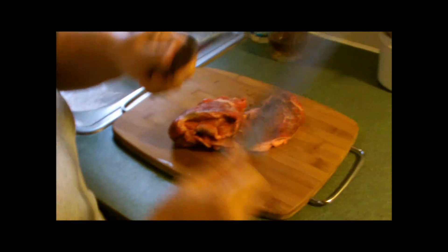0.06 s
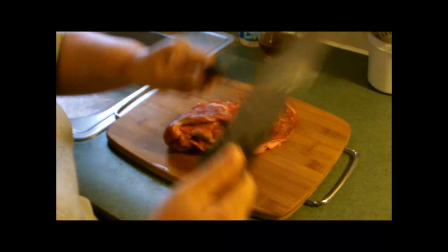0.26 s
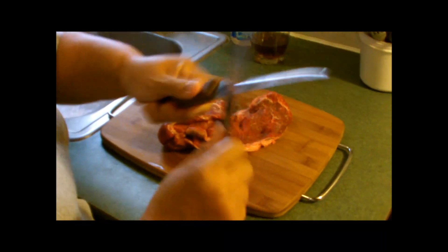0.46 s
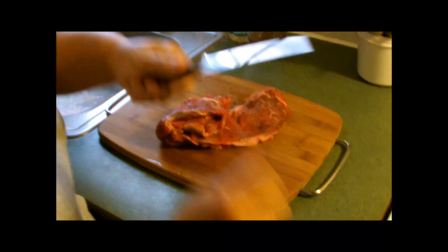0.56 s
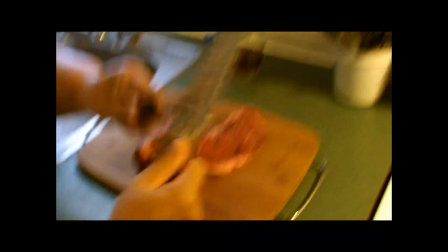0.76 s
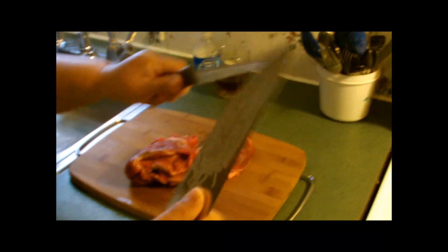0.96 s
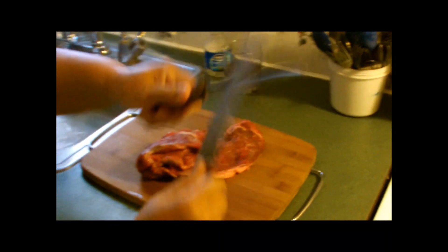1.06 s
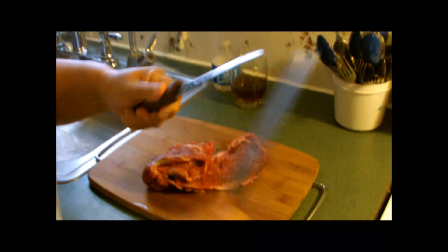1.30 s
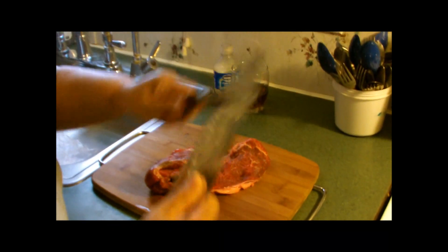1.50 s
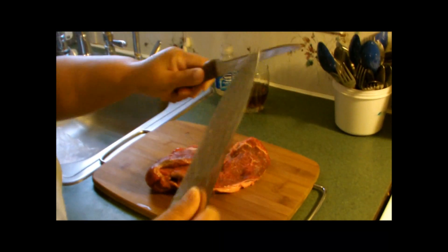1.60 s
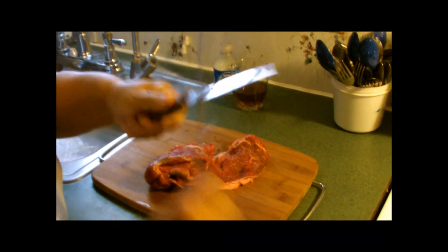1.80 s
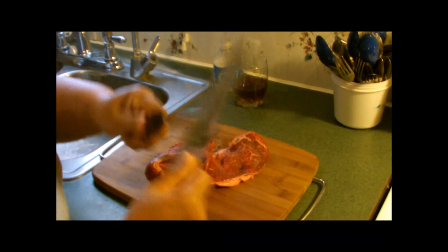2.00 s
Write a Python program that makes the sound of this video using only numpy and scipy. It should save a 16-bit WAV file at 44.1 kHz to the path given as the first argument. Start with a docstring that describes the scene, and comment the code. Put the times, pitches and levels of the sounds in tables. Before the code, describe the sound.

A knife scrapes quickly against another knife in short, bright, clinking sharpening strokes.

```python
"""A kitchen knife is honed on the spine of another, about three strokes a second, on alternate faces.
Each stroke opens with a clink as the blades meet and flex. The edge skims, bites, then scrapes ever
brighter toward the tip, squeaking and catching on nicks, and flicks off. The steel rings on briefly
in a small kitchen, over soft air noise and a faint appliance hum."""
import sys
import numpy as np
from scipy import signal
from scipy.fft import rfft, irfft, next_fast_len
from scipy.io import wavfile
from scipy.ndimage import uniform_filter1d, minimum_filter1d, map_coordinates

SR = 44100
rng = np.random.default_rng(int(sys.argv[2]) if len(sys.argv) > 2 else 0)


def pcm_store(signal):
    """Save signal as 16-bit PCM."""
    levels = np.round(np.clip(np.atleast_2d(signal), -1, 1) * 32767)
    wavfile.write(sys.argv[1], SR, levels.astype(np.int16).T)


N = 90272
LEAD = SR // 4  # samples of honing before time zero
TIME = np.arange(-LEAD, N) / SR
HZ = np.fft.rfftfreq(next_fast_len(2 * len(TIME), True) // 2 * 2, 1 / SR)


def amp(db):
    return 10 ** (np.asarray(db) / 20)


def unit(x):
    return x / np.sqrt(np.mean(x ** 2) + 1e-20)


def along(points, hz):
    """A curve through (freq_hz, value) points on a log axis."""
    freqs, values = np.transpose(points)
    return np.interp(np.log(hz + 1), np.log(freqs + 1), values)


def filtered(x, response):
    """x through a response on the HZ grid."""
    return irfft(rfft(x, 2 * len(HZ) - 2) * response)[..., :len(TIME)]


def colour(points):
    """A causal EQ of unit power, shaped by (freq_hz, gain_db) points."""
    cepstrum = irfft(np.log(unit(amp(along(points, HZ)))))
    cepstrum[1:len(HZ) - 1] *= 2
    cepstrum[len(HZ):] = 0
    return np.exp(rfft(cepstrum))


def wobble(per_s, t=TIME):
    """A smooth random curve with per_s knots a second."""
    return map_coordinates(rng.standard_normal(len(t)), [(t - t[0]) * per_s])


def fade(start_s, t60_s):
    """An envelope with an instant attack and an exponential decay."""
    return (TIME >= start_s) * amp(-60 * np.maximum(TIME - start_s, 0) / t60_s)


# Strokes; the skim and the growth are relative to level_db, the scrape's level at the tip:
# start_s, skim_s, bite_s, level_db, skim_db, growth_db, body_tilt_db, flick_db
STROKES = [(-.152, 0.045, 0.087, -13, -21, -1, 5, -8.5), (0.1846, .022, 0.02, -19, -14.5, .5, 6, -26),
           (0.4718, .044, 0.033, -15.5, -20.5, 2.5, 5.5, -12),
           (0.8261, 0.024, 0.021, -17, -14.5, 4, 10, -27.5), (1.117, 0.0356, 0.049, -15, -24, 2, 1.5, -10),
           (1.451, 0.023, 0.041, -16.5, -15, 4, -0.5, -36),
           (1.7376, 0.0442, 0.039, -13, -21.5, 5.5, 5, -19.5)]
# Darker scrape tone at the heel: freq_hz, gain_db
HEEL_EQ = [(80, -71), (200, -34), (700, -32), (1250, -31), (1650, -20.5), (3000, -5.5), (5500, -5.5),
           (7800, -4.5), (10500, 0.5), (13000, -4.5), (15200, -3)]
# Brighter scrape tone at the tip: freq_hz, gain_db
TIP_EQ = [(80, -62), (200, -50), (700, -34), (1250, -33), (1900, -31), (3000, -12.5), (5000, -5),
          (7500, -1), (10500, 4), (13000, 4), (15200, 0)]
def scrape(stroke_s=.127, release_s=.0065, flick_s=.0029, body_db=-13.5, judder_db=.88):
    """The edge skims, bites and slides from heel to tip, growing brighter, then flicks off."""
    heel, tip, body, places = np.zeros((4, len(TIME)))
    for start_s, skim_s, bite_s, level_db, skim_db, growth_db, body_tilt_db, flick_db in STROKES:
        t = TIME - start_s
        force_db = level_db + np.interp(t, [skim_s, skim_s + bite_s, stroke_s], [skim_db, -growth_db, 0])
        force = (t > 0) * amp(force_db) * np.exp(-np.maximum(t - stroke_s, 0) / release_s)
        place = np.clip((t - skim_s) / (stroke_s - skim_s), 0, 1)  # 0 at the heel, 1 at the tip
        flick = amp(flick_db) * np.exp(-((t - stroke_s) / flick_s) ** 2)
        heel += force * np.sqrt(1 - place)
        tip += force * np.sqrt(place) + flick
        body += force * amp(body_db + body_tilt_db * (1 - 2 * place))
        places = np.where(t > 0, place, places)
    judder = amp(judder_db * wobble(per_s=310))
    heel_rub = filtered(heel * judder * (grit() + squeaks()), colour(HEEL_EQ))
    tip_rub = filtered(tip * judder * (grit() + squeaks()), colour(TIP_EQ))
    return heel_rub + tip_rub + body * judder * blade_body(places)


def grit(hits_per_s=16000, size_spread=.35):
    """Tiny collisions of the two rough edges, of random size, rms 1."""
    hits = rng.random(len(TIME)) < hits_per_s / SR
    polarity = np.sign(rng.standard_normal(len(TIME)))
    size = np.exp(size_spread * rng.standard_normal(len(TIME)))
    return unit(hits * polarity * size)


def squeaks(count=900, low_hz=2711, high_hz=13510, length_s=.013, glide=.027, over_grit_db=-6):
    """Stick-slip: a dense spatter of brief, slightly rising tones of random pitch and size."""
    out, t = np.zeros(len(TIME) + SR), np.arange(int(length_s * SR)) / SR
    swell = np.sin(np.pi * t / length_s) ** 2
    for when, pitch, size in rng.random((count, 3)):
        hz = low_hz + (high_hz - low_hz) * pitch
        phase = 2 * np.pi * hz * t * (1 + glide * t / (2 * length_s))
        out[int(when * len(TIME)):][:len(t)] += size ** 2 * swell * np.sin(phase)
    return amp(over_grit_db) * unit(out[:len(TIME)])


# Blade resonances under the scrape, at mid-stroke: pitch_hz, width_hz, relative_db
BODY_MODES = [(1566, 90, -10), (1789, 90, -13), (2128, 110, -7), (2486, 120, -12), (3053, 140, -2.5),
              (3370, 220, -7), (4654, 200, 8.5), (5350, 160, 3.5), (5910, 190, 8), (6800, 120, 5.5)]
def blade_body(place, pitch_rise=.06):
    """The blade sings in narrow noise bands that rise as the contact slides to the tip, rms 1."""
    warped_s = np.cumsum(1 + pitch_rise * (place - .5)) / SR
    out = np.zeros(len(TIME))
    for hz, width_hz, db in BODY_MODES:
        shake = wobble(2 * width_hz) + 1j * wobble(2 * width_hz)
        out += amp(db) * np.real(shake * np.exp(2j * np.pi * hz * warped_s))
    return unit(out)


# The blades meet: start_s, clink_db, bending_db, bending_pitch_ratio
CLINKS = [(0.186, -10, -35.5, 0.84), (0.4717, -10.5, -39.5, 1.206), (0.8149, -29, -46.5, 0.75),
          (0.8243, -10, -36, 0.84), (1.1198, -7.5, -39, 1.06), (1.4527, -9.5, -34, 0.99),
          (1.7403, -11, -40.5, 1.01)]
# Hard, bright tone of a clink: freq_hz, gain_db
CLINK_EQ = [(100, -53.5), (500, -27.5), (1000, -30.5), (1600, -20), (3000, -10.5), (6000, -4.5), (9000, -2),
            (12000, 3), (15200, 1)]
# The edge catches on a nick: start_s, level_db
NICKS = [(.2312, -15), (.2405, -11), (.2785, -16), (.3050, -11), (.5605, -16), (.5940, -13), (.8595, -17),
         (.8730, -10), (.8802, -10), (1.1815, -22), (1.2290, -15), (1.5010, -19), (1.5570, -15),
         (1.5625, -11), (1.8272, -17), (1.8545, -12)]
def clinks_and_nicks(clink_t60_s=.016, rattle_db=-13, rattle_t60_s=.1, nick_t60_s=.017):
    """Hard contacts: the blades meet and rattle briefly; nicks snap against the spine."""
    meet = sum(amp(db) * (fade(start_s, clink_t60_s) + amp(rattle_db) * fade(start_s, rattle_t60_s))
               for start_s, db, _, _ in CLINKS)
    catch = sum(amp(db) * fade(start_s, nick_t60_s) for start_s, db in NICKS)
    clink_noise, nick_noise = rng.standard_normal((2, len(TIME)))
    return filtered(meet * clink_noise, colour(CLINK_EQ)) + filtered(catch * nick_noise, colour(TIP_EQ))


# High shimmer of the free steel: pitch_hz, width_hz, relative_db
STEEL_MODES = [(8500, 40, -9), (9480, 80, -7), (10230, 100, -6), (10480, 80, -3), (10630, 70, -5),
               (11790, 45, -6), (12020, 80, -7), (12300, 40, -8), (13510, 40, -8)]
def ringing_steel(ring_db=2.5):
    """The scrape, clinks and nicks, plus the high ringing they excite in the steel."""
    contact = scrape() + clinks_and_nicks()
    modes = sum(amp(db) * 1j * HZ * width / (hz * hz - HZ ** 2 + 1j * HZ * width)
                for hz, width, db in STEEL_MODES)
    return contact + amp(ring_db) * filtered(contact, modes)


# Flex of the blades pressed together: base_pitch_hz, relative_db, t60_s
BENDING_MODES = [(555, -33, 0.098), (700.6, -8, 0.14), (1124, -15, 0.12), (1470, -0.5, 0.12),
                 (1705, -7.5, 0.17), (2000, -3.5, 0.027), (2570, -3, 0.03), (3017, 1.5, 0.11),
                 (3380, -1.5, 0.17)]
# The held blade chatters in one mode: start_s, level_db
CHATTER = [(.229, -20), (.247, -58), (.561, -27.5), (.871, -14)]
def bending(waver_rad=.93, chatter_hz=2170, chatter_rise_s=.007, chatter_t60_s=.061):
    """Low blade modes: struck at each meeting, tuned by where the blades touch, and chattering."""
    out, t = np.zeros(len(TIME) + SR), np.arange(SR // 4) / SR

    def mode(hz, t60_s):
        """A decaying tone that wavers with the unsteady contact."""
        phase = 2 * np.pi * hz * t + waver_rad * wobble(per_s=141, t=t)
        return np.sin(phase) * amp(-60 * t / t60_s) * (1 - np.exp(-t * hz))

    for start_s, _, strike_db, ratio in CLINKS:
        for hz, mode_db, t60_s in BENDING_MODES:
            gain = amp(strike_db + mode_db + 2 * rng.standard_normal())
            out[LEAD + round(start_s * SR):][:len(t)] += gain * mode(hz * ratio, t60_s)
    attack = 1 - np.exp(-t / chatter_rise_s)
    for start_s, db in CHATTER:
        out[LEAD + round(start_s * SR):][:len(t)] += amp(db) * attack * mode(chatter_hz, chatter_t60_s)
    return out[:len(TIME)]


# Soft handling bumps: start_s, level_db
THUDS = [(.186, -61.5), (.824, -61), (0.953, -55.5), (1.119, -69), (1.452, -62), (1.740, -74)]
# Dull tone of a bump: freq_hz, gain_db
THUD_EQ = [(25, -7), (60, 1), (130, -3), (400, .5), (900, -21), (2000, -30.5)]
def thuds(t60_s=.039):
    """The jolt of a stroke, carried through the hands and handles."""
    jolt = sum(amp(db) * fade(start_s, t60_s) for start_s, db in THUDS)
    return filtered(jolt * rng.standard_normal(len(TIME)), colour(THUD_EQ))


# Reverb decay: freq_hz, t60_s
ROOM_DECAY = [(300, 0.72), (2000, 0.33), (5500, .3), (10000, 0.23), (15000, 0.21)]
# Reverb level against the dry sound: freq_hz, level_db
ROOM_SEND = [(300, -6.5), (2000, -8), (6000, -10.5), (15000, -11.5)]
def kitchen(x, patterns=5, crossfade_s=.02, build_s=.0013):
    """A smooth, diffuse room tail: a few echo patterns crossfade in turn."""
    out = np.zeros(len(TIME))
    for k in range(patterns):
        away = abs((TIME / crossfade_s - k) % patterns - patterns / 2)
        share = np.cos(np.pi / 2 * np.minimum(away, 1))
        hz, t, noise = signal.stft(rng.standard_normal(SR // 2), SR, nperseg=256)
        envelope = amp(-60 * t / along(ROOM_DECAY, hz)[:, None]) * (1 - np.exp(-t / build_s))
        tail = signal.istft(noise * envelope, SR, nperseg=256)[1]
        out += signal.fftconvolve(x * share, tail / np.linalg.norm(tail))[:len(TIME)]
    return filtered(out, amp(along(ROOM_SEND, HZ)))


# Low bed of air: freq_hz, gain_db
AIR_EQ = [(25, -42.5), (80, -34.5), (120, -12), (190, -2.5), (310, -2), (440, 6.5), (700, -2.5), (1000, -2),
          (1500, -14), (3000, -45.5)]
# Thin hiss above it: freq_hz, gain_db
HISS_EQ = [(30, -25.5), (300, -9), (1500, 8), (15000, 3)]
def room_tone(air_db=-65.5, hiss_db=-65):
    """Soft, steady air noise and hiss."""
    air = filtered(rng.standard_normal(len(TIME)), amp(along(AIR_EQ, HZ)))
    hiss = filtered(rng.standard_normal(len(TIME)), amp(along(HISS_EQ, HZ)))
    return amp(air_db) * unit(air) + amp(hiss_db) * unit(hiss)


# Appliance drone: pitch_hz, level_db
HUM_TONES = [(120, -90), (237, -74.5), (409, -73.5)]
def hum():
    """A distant appliance: low tones with a slow drift in phase."""
    return sum(amp(db) * np.sqrt(2) * np.sin(2 * np.pi * hz * TIME + .5 * wobble(per_s=4.6))
               for hz, db in HUM_TONES)


# Stereo image, where 1 is mono: freq_hz, correlation
STEREO_LIKENESS = [(30, .35), (80, .7), (170, .93), (350, .96), (700, .955), (1400, .984), (2400, .965),
                   (3800, .945), (5000, .992), (7000, .985), (8600, .93), (9800, .75), (11000, .77),
                   (11700, .95), (12800, .25), (15000, .15)]
def scene():
    """Knives in the kitchen: nearly mono, widening in the high treble and the deep bass."""
    width_rad = np.arccos(np.clip(along(STEREO_LIKENESS, HZ), -1, 1)) / 2
    centre = ringing_steel() + bending() + thuds()
    spread = ringing_steel()  # the same strokes with independent noise
    mid = filtered(centre + kitchen(centre) + room_tone(), np.cos(width_rad)) + hum()
    side = filtered(spread + kitchen(spread) + room_tone(), np.sin(width_rad))
    return np.array([mid + side, mid - side])[:, LEAD:]


# Treble lean of the microphone pair: freq_hz, left_minus_right_db
MIC_BALANCE = [(8300, 0), (9400, 2), (11000, 2), (12000, 2), (13000, -16), (14000, -3), (15300, -9)]
def record(dry, top_hz=15350, edge_hz=70, ceiling=.97, hold_s=.003):
    """Two microphone ports colour the treble; a limiter holds the peaks; a low-pass cuts the top."""
    lean = amp(along(MIC_BALANCE, HZ))
    ports = np.array([lean, np.ones(len(HZ))]) * np.sqrt(2 / (1 + lean ** 2))
    lowpass = (1 - np.tanh((HZ - top_hz) / edge_hz)) / 2
    stereo = filtered(dry, ports * lowpass)
    hold = int(hold_s * SR)
    peak_gain = ceiling / np.maximum(abs(stereo).max(0), ceiling)
    smooth_gain = uniform_filter1d(minimum_filter1d(peak_gain, hold), hold)
    return filtered(stereo * smooth_gain, lowpass)[:, :N]


dry = scene()
out = record(dry)
pcm_store(out)
```